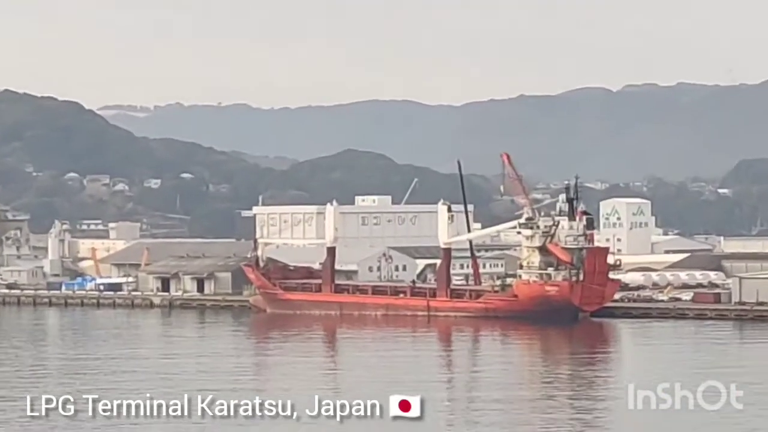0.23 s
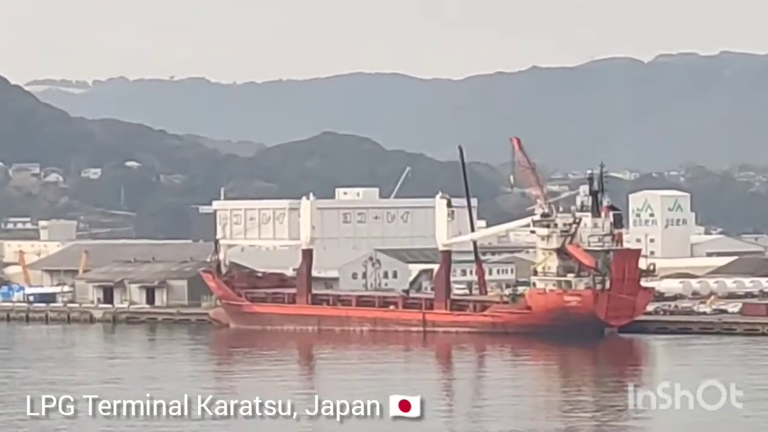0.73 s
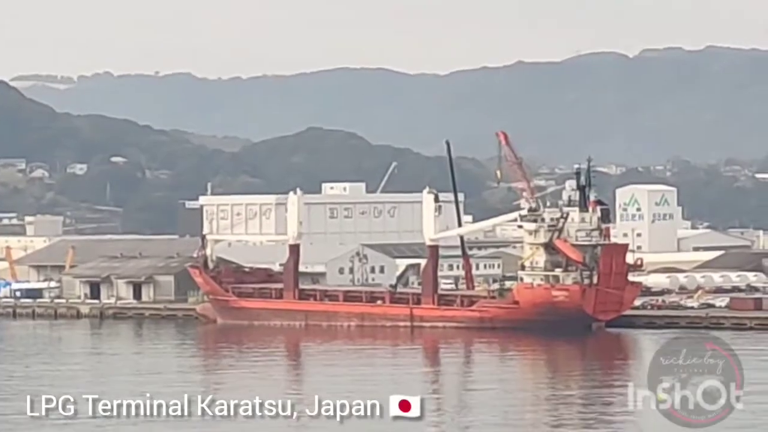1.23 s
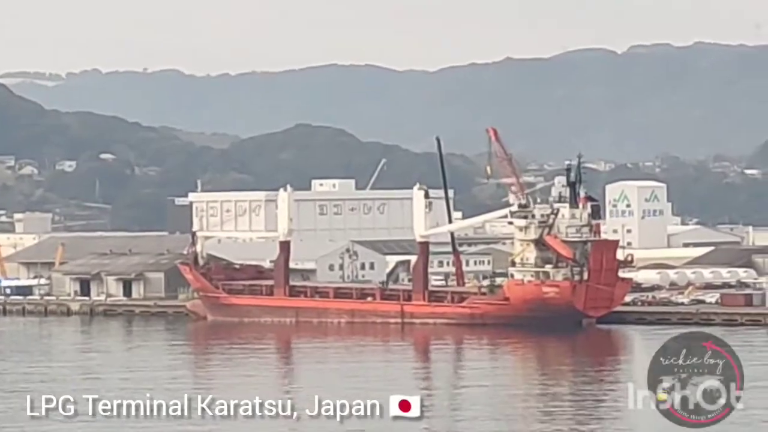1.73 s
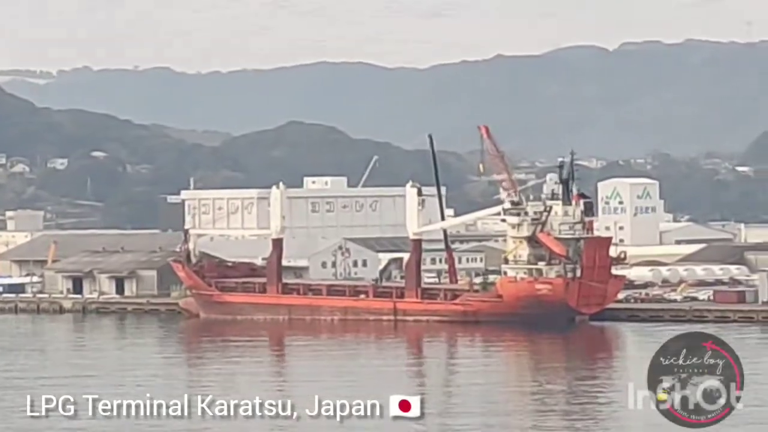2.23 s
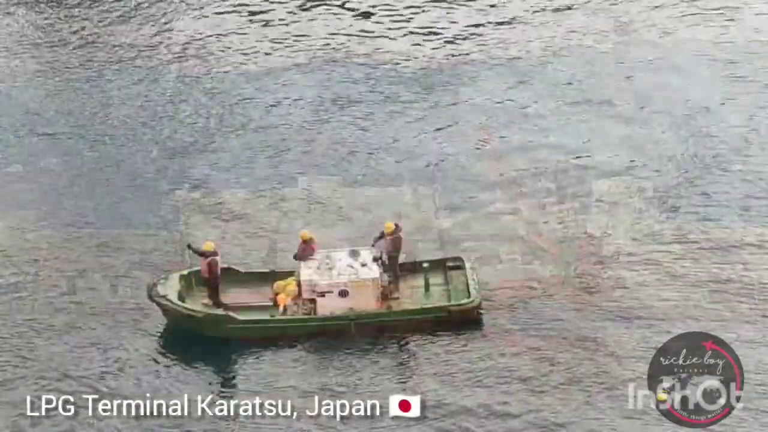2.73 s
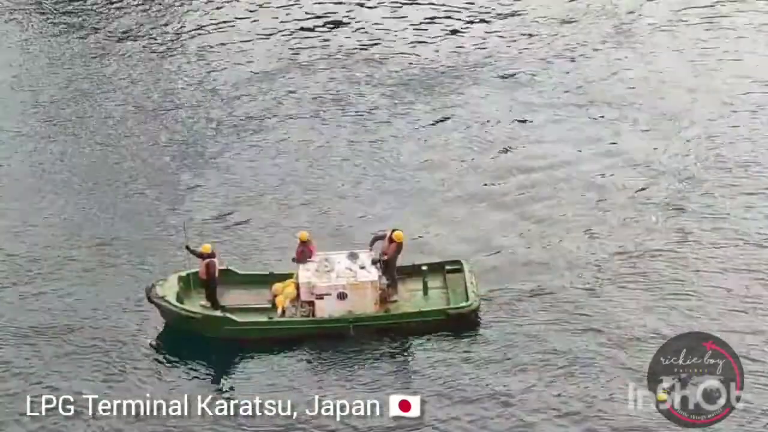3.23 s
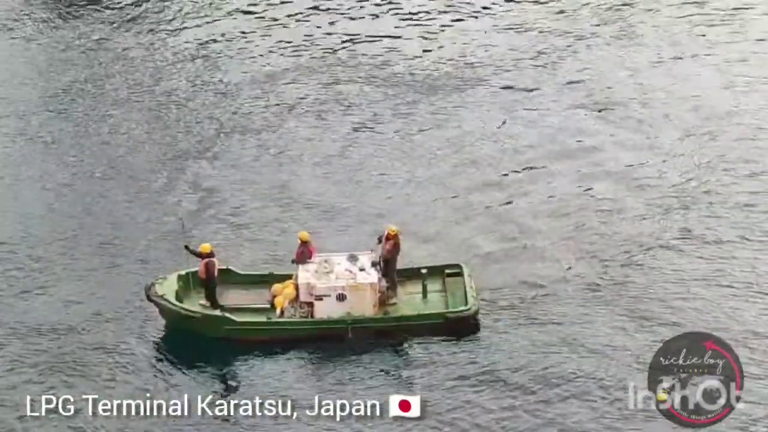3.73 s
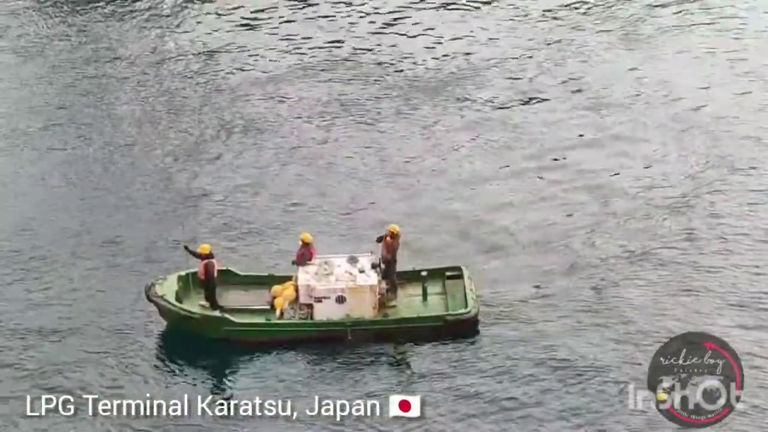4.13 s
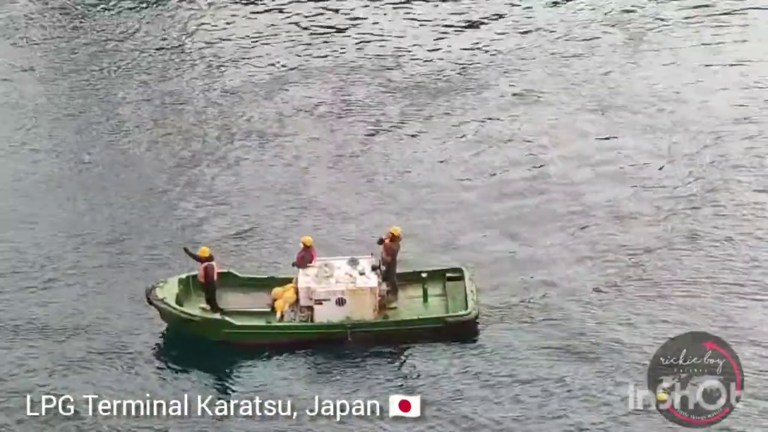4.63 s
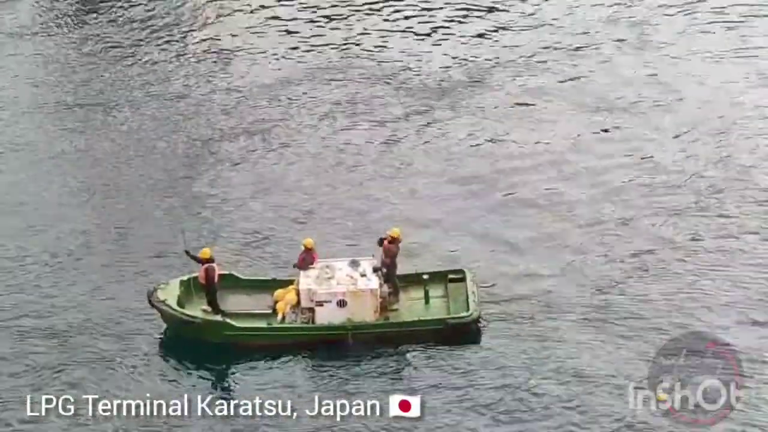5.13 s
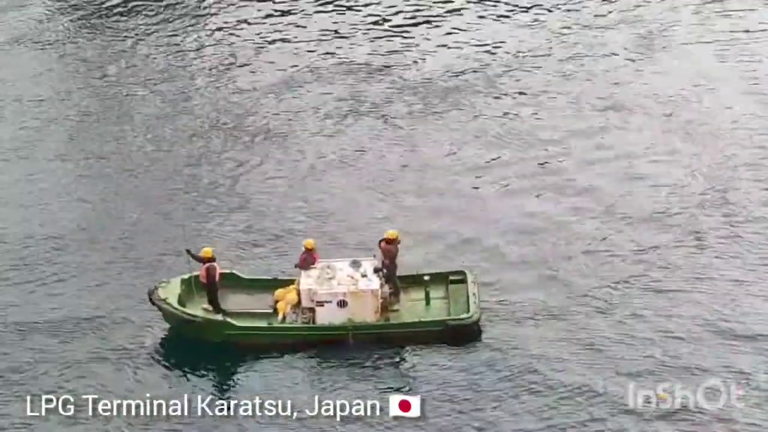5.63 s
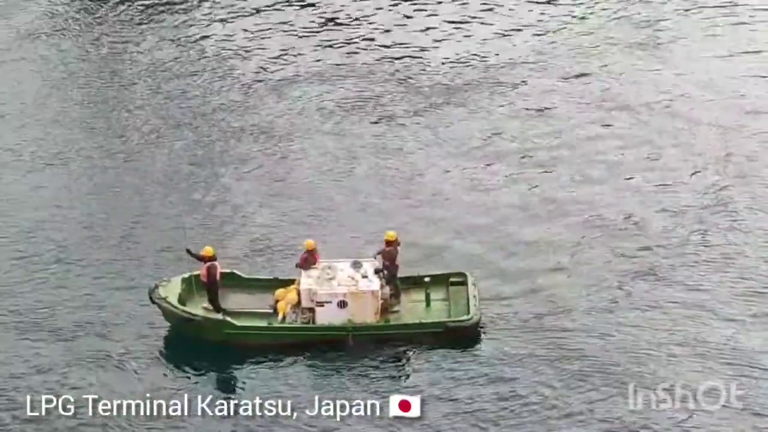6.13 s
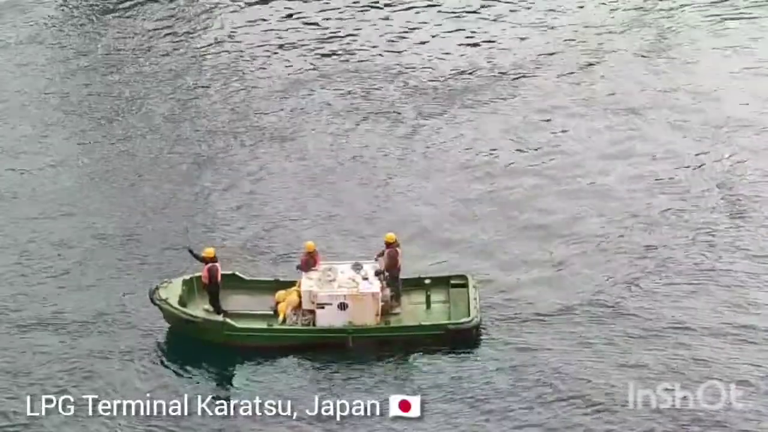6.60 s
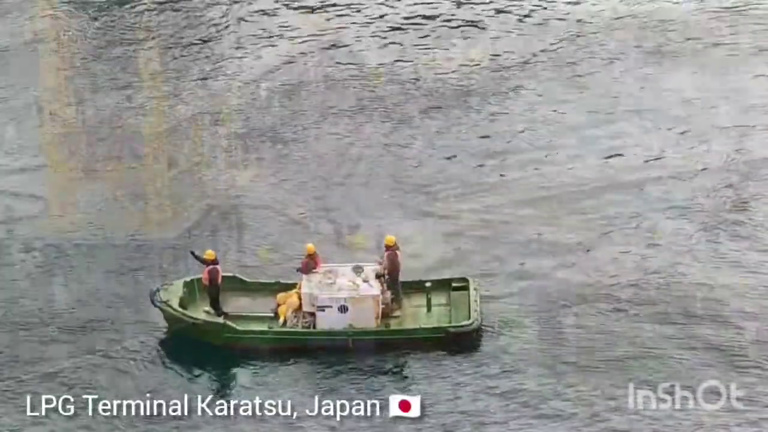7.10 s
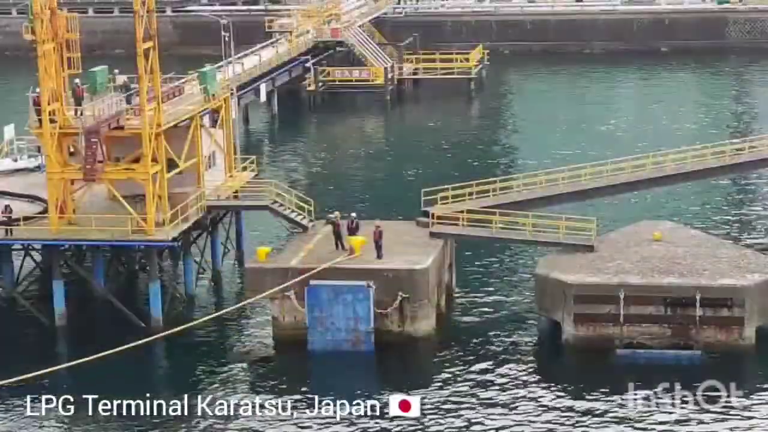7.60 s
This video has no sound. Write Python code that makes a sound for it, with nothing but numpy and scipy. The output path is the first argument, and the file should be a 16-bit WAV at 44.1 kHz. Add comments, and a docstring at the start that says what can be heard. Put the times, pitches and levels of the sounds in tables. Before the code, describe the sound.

A steady, heavy drone fills the open deck of a ship for nearly eight seconds. From 0 to about 2 seconds the listener is beside the funnel: a big ventilation fan hums low, around 200 Hz, with generator tones and a tight cluster of machinery hums just above, all wavering and slightly fluttering. Broad air roar rushes through resonant steel ducts, swelling gently about twice a second, with faint hiss above. Between about 2 and 3 seconds it cross-fades to the rail, where the blade hum and generator weaken, and the duct roar is steadier and hollow. Hum and rumble keep drifting in strength. From about 6.7 to 7.6 seconds it blends into a very similar bow position, continuing to the end without stopping. The small stereo microphone rounds peaks and cuts the extreme treble; there are no distinct separate events.

```python
"""On the open deck of a ship, a big engine-room ventilation fan drones through its steel ducts.
The fan's blade tones, the diesel generator's tones and other hums are wavering sine waves.
The broad air roar is noise shaped by frequency, with duct resonances that make some bands ring out.
The listening spot blends from beside the funnel to the rail and on to the bow.
A small two-port microphone picks it up, rounding the peaks and cutting the highest treble."""
import sys
import numpy as np
from scipy import signal
from scipy.fft import rfft, irfft, next_fast_len
from scipy.io import wavfile

SR = 44100
rng = np.random.default_rng(int(sys.argv[2]) if len(sys.argv) > 2 else 0)


def bounce(signal):
    """Save signal as a 16-bit WAV file at the path given by the first command-line argument."""
    frames = np.transpose(np.atleast_2d(signal))
    limited = np.clip(frames, -1, 1)
    pcm = np.round(limited * 32767).astype(np.int16)
    wavfile.write(sys.argv[1], SR, pcm)


N = 346626

# Fan blade tone and its harmonics, before waver and level curves:
# order, funnel level/dB rms, rail and bow level/dB rms
BLADE_ORDERS = [(1, -24, -35), (2, -35, -38), (3, -49, -42.5), (4, -38, -51.5), (5, -60, -52.5),
                (6, -66, -50), (7, -65, -54)]
# Blade tone pitch: beside the funnel f/Hz, and a touch slower away from it f/Hz
BLADE_HZ = (197.05, 196.4)
# Diesel generator tones, as multiples of its working cycle, before waver:
# order, funnel level/dB rms, rail and bow level/dB rms
ENGINE_ORDERS = [(12, -49, -51), (13, -60, -61), (17, -42.5, -63), (18, -43.5, -64), (19, -40.5, -56),
                 (24, -37, -56), (26, -40, -60), (37, -37, -66)]
CYCLE_HZ = 5.762  # working cycles of the generator per second
# Other machinery hums, before waver and level curve:
# f/Hz, funnel level/dB rms, rail and bow level/dB rms
HUMS = [(122.7, -60, -41), (269.1, -35, -29), (291, -32, -48), (295.7, -29.5, -49), (300.6, -32, -48),
        (306.8, -33, -50), (322.6, -34, -48)]
# Level changes over time:
# t/s, blade tone level/dB, its harmonics level/dB, hums level/dB, 105-190 Hz rumble level/dB
TONE_LEVEL = [(0, -0.5, 2, 1.5, -2), (.35, 1.5, -3, 0, -1.5), (.6, -2, 2.5, -1, 0), (1.1, 0, -2, -1, -2.5),
              (1.55, 0.5, 3, -2.5, -0.5), (2.2, -2, -3, 0, 1), (2.7, 2, 1, -1, 0), (3.1, -3, 2, 1, 2),
              (3.8, 3.5, 6, 1.5, -2), (4.3, 0, 4, 4, 1.5), (4.7, 3.5, 6, 3.5, -2.5), (5.1, 1, 2, 2, 4.5),
              (5.5, -3.5, 5, 0.5, -0.5), (6.3, 0, -4, -6, 0.5), (6.7, 3, 5.5, 4, -3.5),
              (7.1, -1, -2, -4, -1), (7.6, 1.5, 1, 2.5, -1)]
# Level changes of the duct drone: t/s, 190-345 Hz level/dB, 345-600 Hz level/dB
DRONE_LEVEL = [(0, 2, 0), (1, 0.5, -1.5), (2, 0, 0), (2.4, 1.5, -2), (2.9, 1, 1), (3.3, -2, 0), (3.9, 1, 1),
               (4.5, -0.5, 0), (5, -0.5, -0.5), (5.8, 1.5, -1.5), (6.298, 0, 1), (6.8, 0, -0.5),
               (7.2, -0.5, 0), (7.8, 1.5, 0)]

# Broad roar of moving air: f/Hz, left level/dB per Hz, right level/dB per Hz
FUNNEL_ROAR = [(20, -85, -89), (50, -72, -81), (85, -67, -70), (112, -58, -60), (124, -49, -48),
               (230, -59, -50), (345, -48.5, -60), (560, -60.5, -56), (1020, -59.5, -57.5),
               (1284, -58.5, -62.5), (1800, -78, -64), (2620, -76, -71), (3950, -79.5, -76.5),
               (5000, -87.5, -82.5), (6900, -91, -87)]
RAIL_ROAR = [(20, -97, -99), (50, -74, -68), (84, -62.5, -64), (117, -54.5, -53.5), (222, -54, -54),
             (347, -47, -51), (500, -52.5, -56.5), (1060, -58.5, -60), (1370, -61.5, -61), (2050, -72, -65),
             (2830, -76, -72), (3740, -78, -71), (5100, -85, -85), (6880, -92, -84)]
BOW_ROAR = [(20, -84, -84), (50, -68, -71.5), (85, -61, -63), (115, -59, -55), (225, -57, -54),
            (350, -47, -58), (510, -51, -59), (1000, -61, -60), (1420, -62, -60.5), (2000, -73, -67),
            (2620, -76, -69.5), (3530, -79, -69), (4660, -83, -82), (6900, -94, -88.5)]
# Thin hiss above the roar: f/Hz, left level/dB per Hz, right level/dB per Hz
FUNNEL_HISS = [(6950, -97, -99), (7740, -95, -99), (8720, -84, -84), (9870, -96, -87), (10600, -104, -93),
               (11000, -110, -104), (11900, -104, -100), (13500, -115, -94.5), (15000, -125, -97),
               (15600, -130, -102)]
RAIL_HISS = [(6800, -95, -99), (7800, -95, -99), (8930, -86.5, -93.5), (9800, -98, -89.5),
             (10600, -103, -87), (11600, -100, -90), (12400, -108, -92.5), (13400, -120, -100.5),
             (13800, -135, -125), (15600, -140, -140)]
# Duct and casing resonances added to the roar: centre f/Hz, width f/Hz, top level/dB per Hz
FUNNEL_DUCTS = [(135, 26, -43.5), (177, 17, -42), (247, 11, -48), (286, 31, -41.5), (306, 18, -41.5),
                (323, 14, -43.5), (370.5, 13, -44), (392.6, 32, -41), (452, 52, -44), (488, 20, -44),
                (506.5, 43, -45), (608, 64, -52.5), (692, 78, -55), (743, 44, -59), (839, 35, -57),
                (910, 17, -55), (1587, 350, -63), (2450, 250, -72)]
RAIL_DUCTS = [(125.4, 14, -54), (139.4, 16, -50.5), (158, 18.6, -43.5), (172.6, 12.5, -46),
              (269.4, 17.4, -41), (290.2, 26, -40), (321, 21.4, -41.5), (395, 29, -42.5),
              (437.4, 32.7, -39), (483, 17, -49.5), (542, 21, -50), (579, 23, -53), (673, 57, -55.5),
              (766, 170, -58.5), (1230, 25, -57.5), (1690, 44, -64)]
# What the two microphone ports share: f/Hz, likeness (0-1), lag of the left port/radians
FUNNEL_PORTS = [(30, .96, .3), (70, 0.97, 0.15), (220, 0.93, 0.15), (298, 1, 0.52), (484, 0.84, 0.85),
                (786, 0.18, 1.35), (1010, 0.8, 1.87), (1260, 0.3, 2.45), (1610, 0.07, 5.8),
                (2000, 0.3, 3.8), (2410, 0.65, 7.3), (3960, 0.09, 9.6), (15000, 0.1, 30.5)]
RAIL_PORTS = [(30, 0.89, .3), (70, 0.98, 0.17), (220, 0.95, 0.11), (282, 0.94, 0.32), (410, 0.8, 0.037),
              (556, 0.51, 0.2), (684, 0.55, 0.36), (880, 0.39, 0.14), (1250, 0.13, 1.9), (1900, 0.31, 2.26),
              (2320, 0.52, 0.9), (4100, 0.064, 3.2), (15100, 0.2, 10.2)]
# Straight cross-fades to the next listening spot: start t/s, length t/s
MOVES = [(2.058, 0.9), (6.694, 0.92)]

PATH_WANDER_S = 0.0003  # spread of travel time through moving air: blurs high tones more than low
HUM_WANDER_S = 0.00062  # spread of the slow timing drift that slides the hums in pitch
FLUTTER_DB, FLUTTER_CORNER_HZ = 1.5, 14.3  # spread and speed of the rough flutter of every tone
# Swings of the roar above 600 Hz; below that air() halves them
THROB_HZ, THROB_CREST_S, THROB_DB = 1.94, 0.088, 0.65
RAIL_SWELL_DB, BOW_SWELL_DB = 0.25, 0.19
LIMIT = 0.92  # ceiling towards which the peaks are rounded
CUTOFF_HZ = 15650


def machinery(funnel_gain, far_gain, waver_db, engine_waver_db):
    """Turning machines give tones at whole multiples of their rate; hums have pitches of their own."""
    orders, engine, hums = np.array(BLADE_ORDERS), np.array(ENGINE_ORDERS), np.array(HUMS)
    blade_db, harmonics_db, hums_db, _ = in_time(TONE_LEVEL)
    blade_hz = funnel_gain * BLADE_HZ[0] + (1 - funnel_gain) * BLADE_HZ[1]
    steady = np.ones(N)
    # base pitch, tones, level change, waver, slow slide
    groups = [
        (blade_hz, orders[:1], blade_db, engine_waver_db, 0),
        (blade_hz, orders[1:], harmonics_db, waver_db, 0),
        (CYCLE_HZ * steady, engine, 0, engine_waver_db, 0),
        (steady, hums, hums_db, waver_db, HUM_WANDER_S),  # base 1 Hz: the multiples are the pitches
    ]
    out = 0
    for base_hz, rows, level_db, sway_db, slide_s in groups:
        multiples = rows[:, :1]
        near = funnel_gain * amp(rows[:, 1:2])
        far = far_gain * amp(rows[:, 2:])
        near_share = near ** 2 / (near ** 2 + far ** 2)
        start_hz = multiples[:, 0] * base_hz[0]
        near_lag = at_hz(FUNNEL_PORTS, start_hz)[1][:, None]
        far_lag = at_hz(RAIL_PORTS, start_hz)[1][:, None]
        lags = near_share * near_lag + (1 - near_share) * far_lag
        rms = np.hypot(near, far)
        out = out + amp(level_db) * tones(multiples * base_hz, rms, lags, sway_db, slide_s)
    return out


def tones(hz, rms, lags, waver_db, slide_s):
    """Sine waves that waver in level and timing on their way through moving air."""
    out = np.zeros((2, N))
    for pitch_hz, height, lag in zip(hz, rms, lags):
        delay_s = PATH_WANDER_S * drift(2.85) + slide_s * drift(0.55)
        turns = np.cumsum(pitch_hz) / SR + pitch_hz * delay_s
        phase = 2 * np.pi * (turns + rng.random())
        level_db = waver_db * drift(5.1) + FLUTTER_DB * drift(FLUTTER_CORNER_HZ)
        peak = np.sqrt(2) * height * amp(level_db)
        out += peak * np.sin([phase - lag, phase])  # left, right
    return out


def air(roar, hiss, ducts, ports, flicker_db_per_octave, swell_db):
    """Rough air rushes through ducts that ring; each port hears a common part and a part of its own."""
    size = next_fast_len(N, real=True)
    hz = np.maximum(np.arange(size // 2 + 1) * SR / size, 1)
    power = amp(2 * at_hz(roar + hiss, hz))  # dB doubled gives power instead of gain
    for centre_hz, width_hz, top_db in ducts:
        offset = 2 * (hz - centre_hz) / width_hz
        power = power + amp(2 * top_db) / (1 + offset ** 2) ** 2  # resonance passed twice: steep skirts

    alike, lag = at_hz(ports, hz)
    alike = np.clip(alike, 0, 1)
    common, left, right = rfft(rng.standard_normal((3, size)))
    shared = common * np.exp(-1j * np.array([lag, 0 * lag]))
    own = np.array([left, right])
    waves = np.sqrt(alike) * shared + np.sqrt(1 - alike) * own
    waves = waves * np.sqrt(power * SR / 2)

    def band(low, high):
        """The part of the noise from low to high Hz, back as a sound wave."""
        return irfft(waves * ((hz >= low) & (hz < high)), size)[:, :N]

    together = drift(6.8)  # level drift common to all bands
    rumble_db = in_time(TONE_LEVEL)[3]
    out = 0
    edges = [0, 105, 190, 345, 600]
    for low, high, own_db in zip(edges, edges[1:], [0, rumble_db, *in_time(DRONE_LEVEL)]):
        out = out + band(low, high) * amp(0.5 * swell_db + 0.5 * together + own_db)
    edges = [600, 2000, 4500, 6900, 9500, SR]
    # each higher band flickers in level by chance, more strongly the higher it is
    for low, high in zip(edges, edges[1:]):
        depth_db = flicker_db_per_octave * np.log2(low / 400)
        flicker_db = depth_db * drift(23.0) + 2.9 * flicker_db_per_octave * together
        out += band(low, high) * amp(swell_db + flicker_db)
    return out


def throb():
    """Beside the funnel the roar rises and falls evenly about twice a second, in dB."""
    return THROB_DB * np.cos(2 * np.pi * THROB_HZ * (np.arange(N) / SR - THROB_CREST_S))


def spot_gains():
    """Gains of funnel, rail and bow: each move fades one spot out and the next in."""
    t = np.arange(N) / SR
    first, second = [np.clip((t - start_s) / length_s, 0, 1) for start_s, length_s in MOVES]
    return 1 - first, first - second, second


def drift(corner_hz):
    """Slow chance movement: noise smoothed twice by the same low-pass filter, with a spread of 1."""
    step = 40  # made at a lower rate: one value per 40 samples
    r = np.exp(-2 * np.pi * corner_hz * step / SR)
    noise = rng.standard_normal(N // step + 2002)
    slow = signal.lfilter([1], [1, -2 * r, r * r], noise)[2000:]  # drop the filter's run-in
    return np.interp(np.arange(N) / step, np.arange(len(slow)), slow / slow.std())


def amp(db):
    """Turn dB into gain."""
    return 10 ** (np.asarray(db) / 20)


def at_hz(rows, hz):
    """Read a table's columns at any frequency, along a log-frequency axis."""
    f, *columns = np.transpose(rows)
    return np.array([np.interp(np.log(hz), np.log(f), c) for c in columns])


def in_time(rows):
    """Read a time table's columns, one value per sample."""
    s, *columns = np.transpose(rows)
    return [np.interp(np.arange(N) / SR, s, c) for c in columns]


def scene():
    """Blend three listening spots; rail and bow share the same ducts and tones."""
    funnel_gain, rail_gain, bow_gain = spot_gains()
    far_gain = np.hypot(rail_gain, bow_gain)
    hums = machinery(funnel_gain, far_gain, waver_db=1.5, engine_waver_db=0.9)
    rail_swell = RAIL_SWELL_DB * drift(0.38)
    bow_swell = BOW_SWELL_DB * drift(0.9)
    funnel = air(FUNNEL_ROAR, FUNNEL_HISS, FUNNEL_DUCTS, FUNNEL_PORTS, 0.3, throb())
    rail = air(RAIL_ROAR, RAIL_HISS, RAIL_DUCTS, RAIL_PORTS, 0.15, rail_swell)
    bow = air(BOW_ROAR, RAIL_HISS, RAIL_DUCTS, RAIL_PORTS, 0.13, bow_swell)
    return hums + funnel_gain * funnel + rail_gain * rail + bow_gain * bow


def record(dry):
    """The microphone's input rounds the peaks, then a steep filter cuts the top."""
    cut = signal.ellip(10, 0.5, 80, CUTOFF_HZ, fs=SR, output="sos")  # 0.5 dB ripple, 80 dB cut
    rounded = LIMIT * np.tanh(dry / LIMIT)
    settled = signal.sosfilt_zi(cut)[:, None] * rounded[:, :1]  # avoids a click at the start
    return signal.sosfilt(cut, rounded, zi=settled)[0]


dry = scene()
out = record(dry)
bounce(out)
```